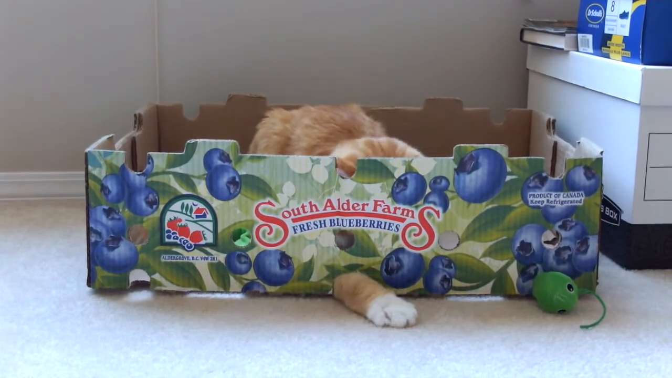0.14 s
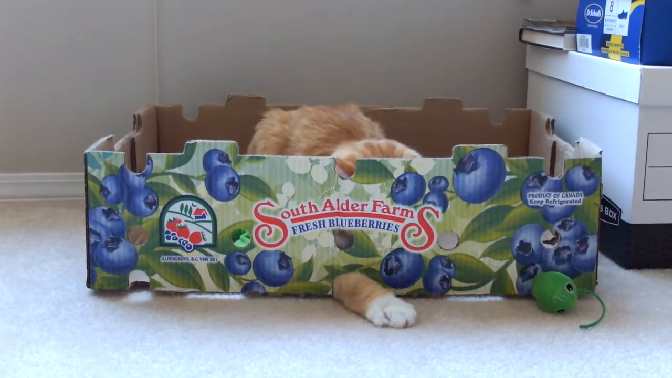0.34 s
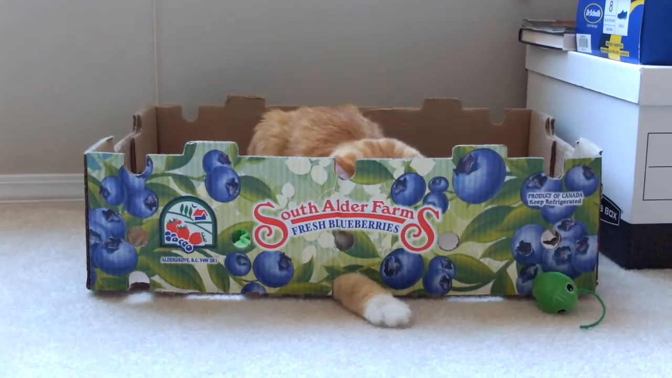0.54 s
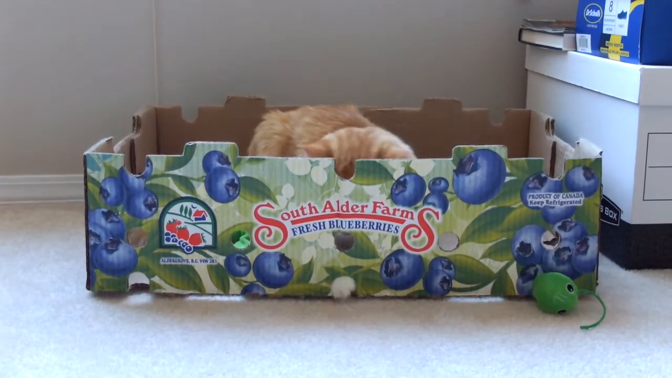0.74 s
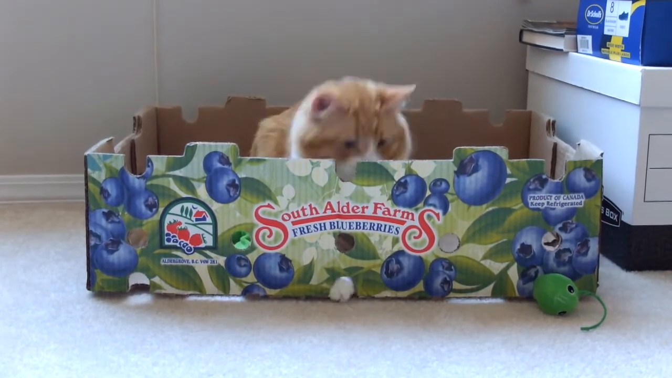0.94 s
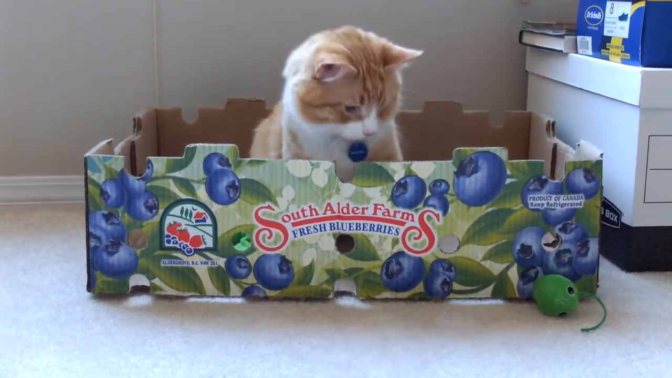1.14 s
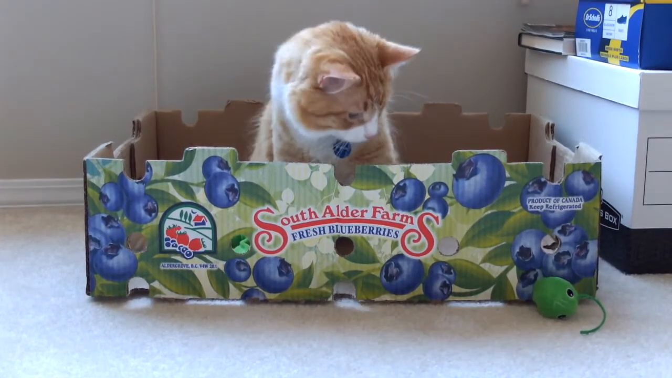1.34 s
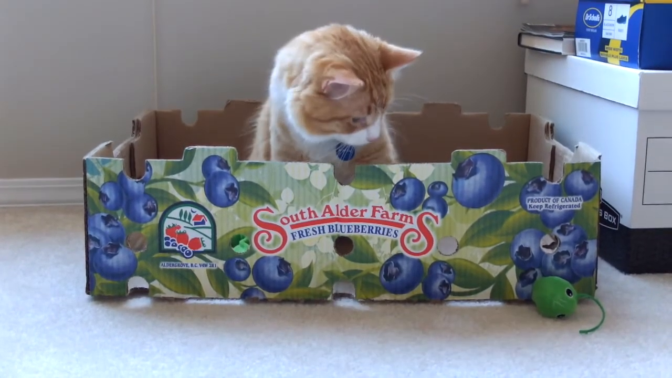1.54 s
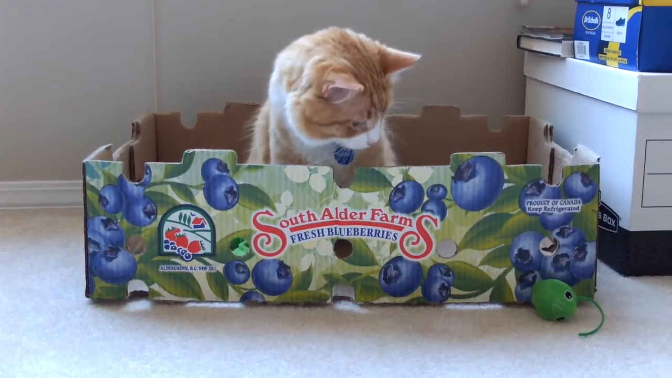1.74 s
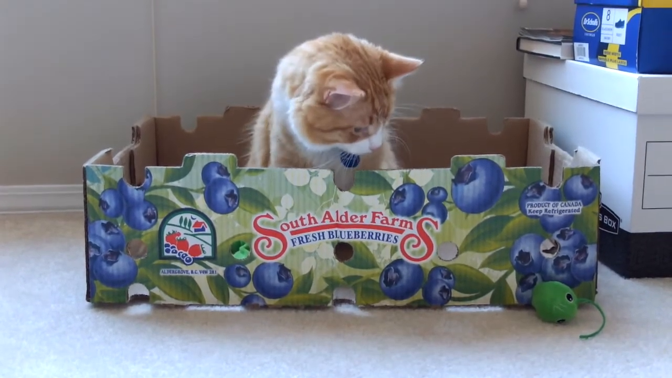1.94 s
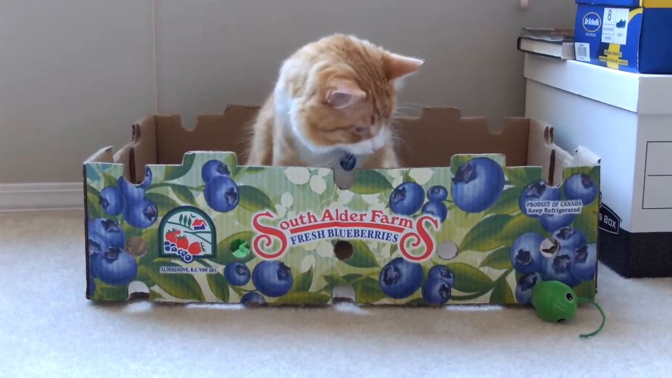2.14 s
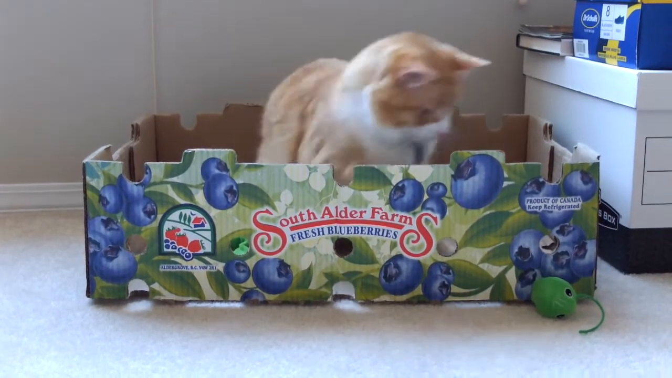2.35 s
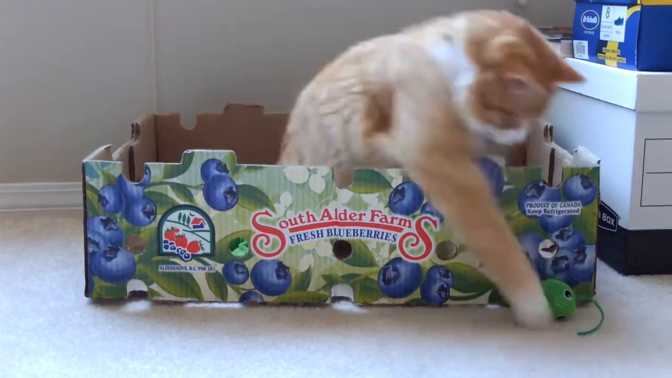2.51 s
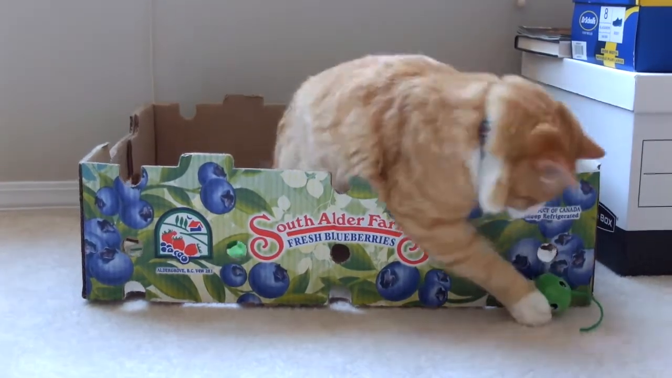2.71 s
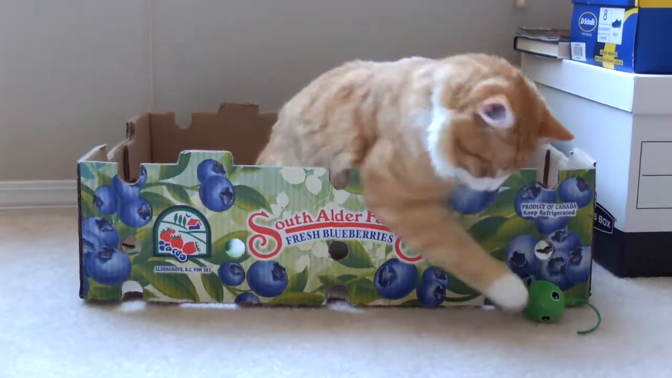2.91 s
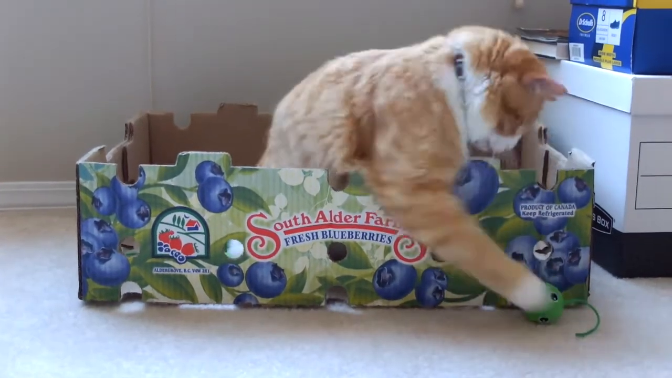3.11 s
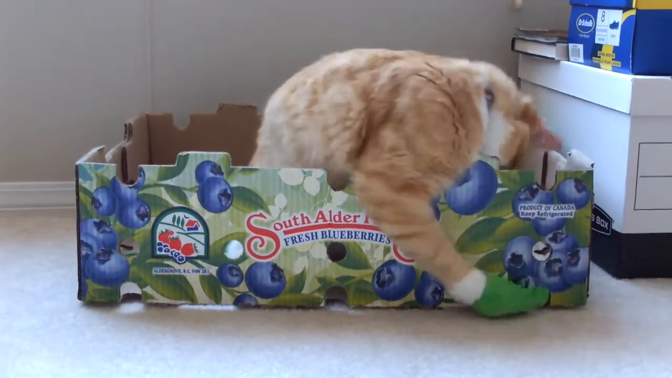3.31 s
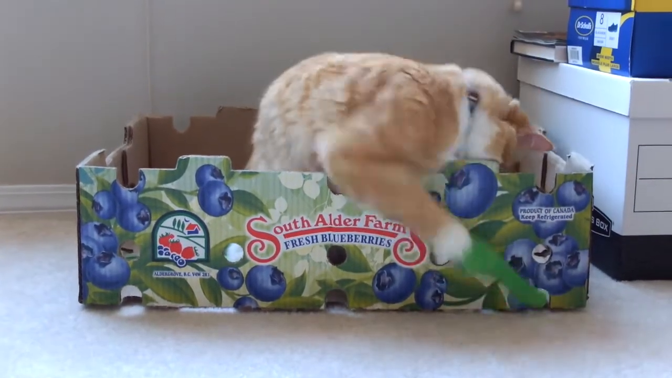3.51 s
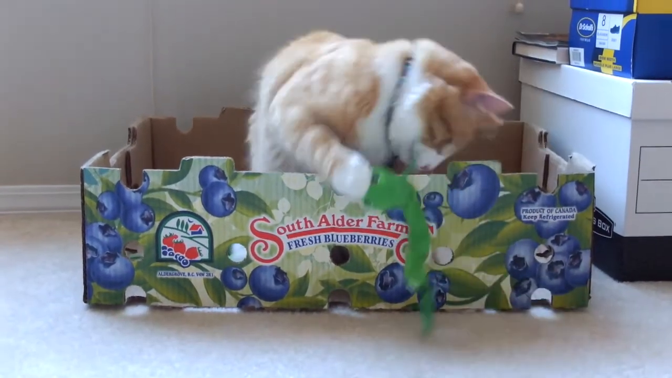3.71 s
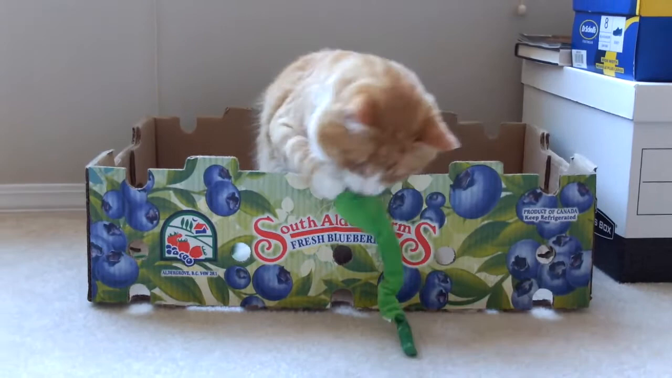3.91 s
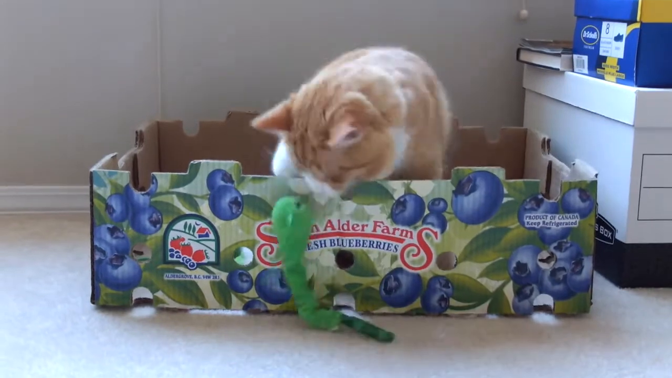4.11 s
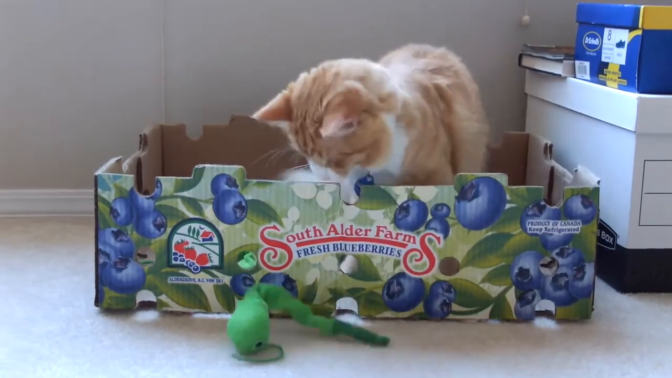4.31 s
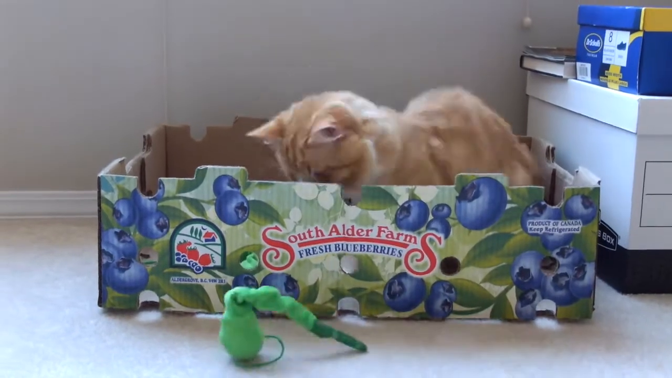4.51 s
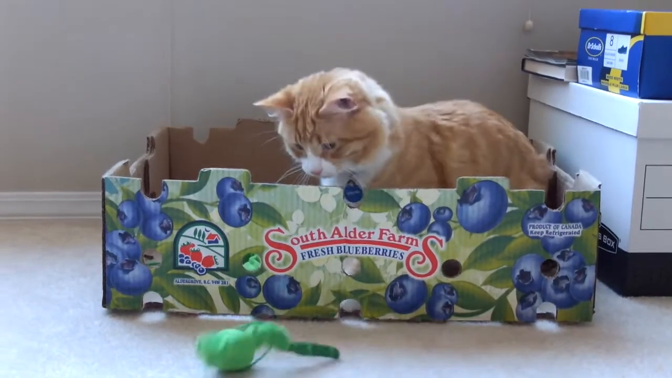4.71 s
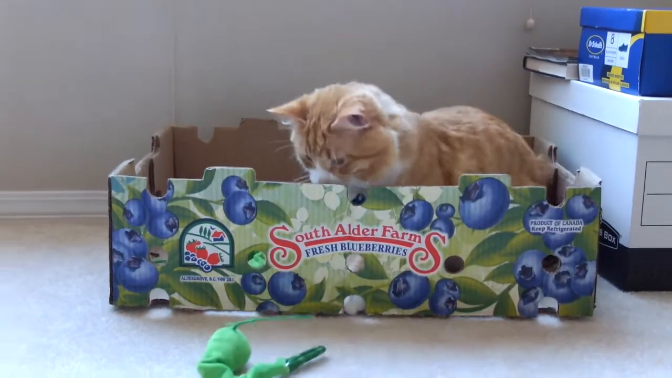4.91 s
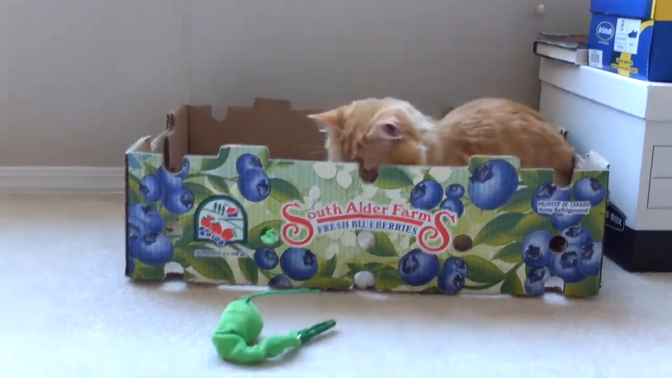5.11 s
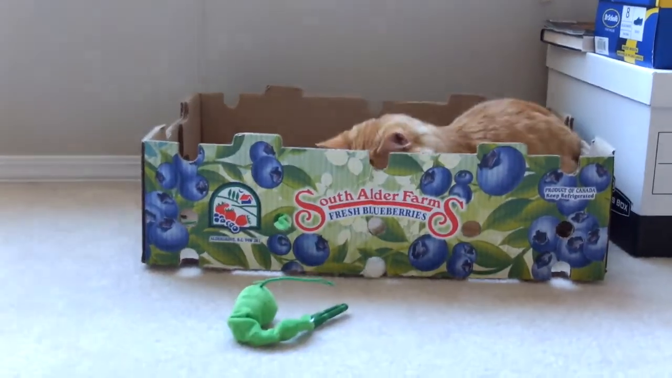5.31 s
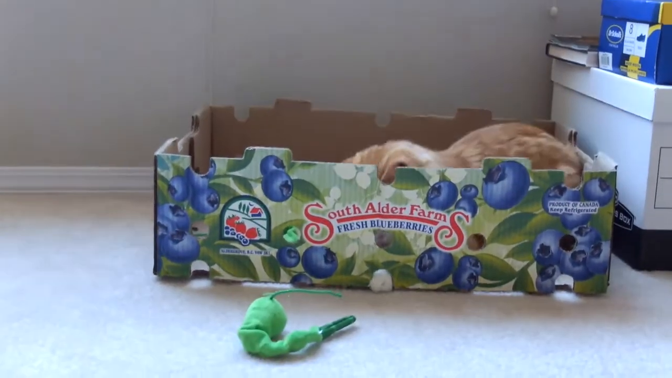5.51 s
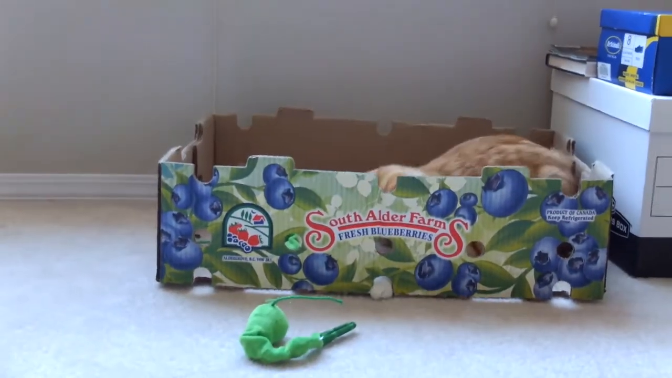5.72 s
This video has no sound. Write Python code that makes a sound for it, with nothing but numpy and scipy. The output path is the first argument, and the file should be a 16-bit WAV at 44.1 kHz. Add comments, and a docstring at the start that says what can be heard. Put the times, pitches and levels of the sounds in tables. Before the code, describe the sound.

A cat rubs and paws inside a cardboard box, with a flurry of hollow knocks and claw ticks over a steady room hum.

```python
"""A cat plays in an open cardboard box on a carpet, two metres from a small stereo microphone.
Fur rubs along the paper and a leg slides back through a hole in the wall, whose rim sings. From 2.3 s
paws knock the walls, claws tick, its weight thuds on the floor panel and the metal collar tag tinkles
once. After 3.4 s the knocks and rubs are lighter, then thin out. Throughout, a furnished room answers
over its steady ventilation hum and a thin electrical whine."""
import sys
import numpy as np
from scipy import signal
from scipy.fft import rfft, irfft
from scipy.io import wavfile
from scipy.ndimage import uniform_filter1d

SR = 44100
rng = np.random.default_rng(int(sys.argv[2]) if len(sys.argv) > 2 else 0)


def put_to_file(sound):
    """Save the sound as 16-bit audio at rate SR, in the file named by the first command-line argument."""
    columns = np.atleast_2d(sound).T  # one column per channel
    safe = np.clip(columns, -1, 1)
    whole_steps = np.round(safe * 32767)
    wavfile.write(sys.argv[1], SR, whole_steps.astype(np.int16))


N = 253575
T = np.arange(N) / SR

# long walls, stiff edges, corrugation: pitch_hz, level_db, base_t60_s
WALL_MODES = [(242.3, -23, 0.7), (298.4, -14.5, 0.16), (342.4, -8.5, 0.15), (392, -3.5, 0.075),
              (447.7, 2.5, 0.059), (540, -67, 0.062)]
EDGE_MODES = [(600, -4, 0.12), (685, -3, 0.079), (784, 8.5, 0.081), (908, 10.5, 0.042), (1001, 4.5, 0.08),
              (1106, 5, 0.14), (1171, 14.5, 0.022), (1260, -31.5, 0.0099), (1273, -10.5, 0.032)]
RIB_MODES = [(1330, -5, 0.11), (1488, 13, 0.039), (1800, -39, 0.011), (1735, 23.5, 0.0093),
             (1980, -11, 0.0037), (2156, 7, 0.046), (2620, 8, 0.015)]
# paw blows: start_s, wall_db, wall_favour_hz, edge_db, edge_favour_hz, rib_db, t60_scale
KNOCKS = [(0.922, -42, 480, -40.5, 816, -58, 0.69), (2.351, -38, 244, -38.5, 708, -42.5, 1),
          (2.545, -31.5, 450, -28.5, 1250, -41, 1), (2.553, -56, 498, -19.5, 940, -28.5, 1),
          (2.565, -33, 509, -49, 837, -42, 1), (2.587, -13, 327, -27, 790, -35, .84),
          (2.603, -15.5, 310, -47, 1200, -33, 0.64), (2.669, -27, 490, -38, 686, -32, 1),
          (2.797, -23.5, 500, -17, 1190, -18.5, 0.64), (2.805, -22.5, 431, -26.5, 1240, -34, 0.67),
          (2.899, -28, 600, -16, 800, -23, 0.24), (2.91, -22, 246, -23, 900, -40, 0.38),
          (2.916, -53, 473, -17.5, 655, -21, 0.31), (2.923, -27, 546, -23, 651, -32, 0.94),
          (2.933, -28, 231, -30, 1330, -23.5, 0.23), (2.942, -22.5, 256, -27, 805, -25, 0.68),
          (2.977, -21, 314, -22, 646, -53, 1), (3.061, -11, 477, -17, 630, -12.5, 1),
          (3.075, -48, 345, -16.5, 720, -19.5, 0.49), (3.094, -49, 343, -43, 660, -25, 1),
          (3.352, -20, 494, -17.5, 716, -24, 0.71), (3.614, -41, 238, -36.5, 850, -55, 0.71),
          (3.659, -38.5, 368, -63, 681, -56, 1), (3.788, -30, 240, -52, 751, -54, 0.74),
          (3.8, -39, 240, -57, 807, -55, .52), (3.992, -18, 373, -22, 890, -32, 1),
          (4.047, -38, 340, -37, 670, -45, 0.71), (4.159, -29.5, 243, -31.5, 1220, -33.5, .9),
          (4.173, -28.5, 375, -59, 791, -42, 0.78), (4.222, -42, 261, -47, 945, -45, 0.6),
          (4.233, -57, 269, -31, 1270, -37, 1), (4.369, -46, 249, -59, 759, -60, .9),
          (4.486, -37, 388, -53, 708, -48, .79), (4.51, -56, 471, -37.5, 1160, -37, 1),
          (5.315, -38, 479, -45, 1320, -45, 1)]

def paw_knocks():
    """Every blow rings the parts of the box in its own proportion."""
    out = np.zeros(N)
    for start_s, wall_db, wall_hz, edge_db, edge_hz, rib_db, t60_scale in KNOCKS:
        add(out, start_s, undb(wall_db) * ring(WALL_MODES, wall_hz, t60_scale, detune=0.037))
        add(out, start_s, undb(edge_db) * ring(EDGE_MODES, edge_hz, t60_scale, detune=0.06))
        add(out, start_s, undb(rib_db) * ring(RIB_MODES, 1580, t60_scale, detune=0.056))
    return out


# floor panel of the box: pitch_hz, level_db, base_t60_s
PANEL_MODES = [(93.5, -4, 0.16), (134, -1, 0.21), (155, 7.5, 0.099), (154.4, 4, 0.27), (190.7, 18, 0.089)]
# landings: start_s, peak_db, favour_hz
THUDS = [(0.66, -50, 122), (2.35, -30.5, 163), (2.357, -33, 157), (2.552, -35.5, 170), (2.587, -30.5, 199),
         (2.67, -38, 216), (2.743, -29, 130), (2.898, -28.5, 173), (2.938, -34, 208), (3.075, -28, 139),
         (3.093, -37, 212), (3.213, -48.5, 109), (3.582, -43.5, 105), (3.671, -43, 100),
         (3.769, -36.5, 136), (3.789, -31.5, 208), (3.992, -36.5, 200), (4.173, -47, 213), (4.37, -46, 151),
         (4.423, -40.5, 217), (4.486, -39, 161), (4.51, -34, 167), (5.317, -32, 189), (5.555, -47, 171)]

def panel_thuds():
    """The cat's weight thuds on the floor panel."""
    out = np.zeros(N)
    for start_s, peak_db, favour_hz in THUDS:
        add(out, start_s, undb(peak_db) * ring(PANEL_MODES, favour_hz, t60_scale=1.1, detune=0.063))
    return out


# floor under the box: pitch_hz, level_db, base_t60_s
FLOOR_MODES = [(58, -7, 0.073), (81, 11, .08)]
# heavy steps: start_s, peak_db
STEPS = [(2.587, -46), (2.745, -61), (3.665, -50), (3.767, -42), (3.787, -40), (4.515, -64)]

def floor_booms():
    """Heavy steps boom through the floor."""
    out = np.zeros(N)
    for start_s, peak_db in STEPS:
        add(out, start_s, undb(peak_db) * ring(FLOOR_MODES, detune=0.05))
    return out


# claw contacts: start_s, peak_db, pitch_hz
TICKS = [(0.661, -49, 5430), (0.921, -49.5, 2830), (1.056, -47.5, 3990), (1.329, -48, 4330),
         (2.553, -33.5, 2700), (2.564, -33, 5560), (2.586, -33, 2750), (2.669, -34.5, 2940),
         (2.797, -27, 5730), (2.898, -24, 2900), (2.919, -32, 3230), (2.925, -31, 2900), (2.931, -26, 2920),
         (3.06, -28.5, 2730), (3.094, -33, 2880), (3.352, -36.5, 3020), (3.581, -40, 7080),
         (3.611, -37, 3640), (3.622, -42, 6700), (3.659, -34, 3940), (3.672, -42, 3130), (3.801, -47, 5800),
         (3.836, -34, 3400), (3.847, -46, 3420), (3.875, -45, 3300), (3.993, -35.5, 2860),
         (4.159, -24.5, 4680), (4.221, -41.5, 3240), (4.51, -51, 3420), (4.893, -48, 6100),
         (5.554, -46, 5690)]

def claw_ticks():
    """Claw tips skip over the paper, each a short noisy scratch around one pitch."""
    out, t = np.zeros(N), T[:SR // 10]
    for start_s, peak_db, pitch_hz in TICKS:
        burst = rng.standard_normal(len(t)) * undb(-30 * t / 0.0092)
        tick = butterworth(resonate(burst, pitch_hz, q=2.1), [2200, min(2.53 * pitch_hz, 0.4 * SR)])
        add(out, start_s, undb(peak_db) * tick / np.abs(tick).max())
    return out


# fur or claw along the paper: start_s, top_rms_db, centre_hz, length_s
STROKES = [(0.003, -49, 4950, 0.079), (0.03, -66, 2780, 0.023), (0.644, -44.5, 5470, 0.073),
           (0.67, -59.5, 5500, 0.2), (2.903, -47, 2390, 0.02), (2.924, -53, 3000, 0.055),
           (3.091, -41, 2200, 0.025), (3.258, -56.5, 6600, 0.077), (3.538, -48, 6200, 0.052),
           (3.563, -50.5, 3120, 0.054), (3.603, -45, 6850, 0.047), (3.646, -51.5, 4100, 0.072),
           (3.999, -53.5, 2900, 0.027), (4.192, -46, 2800, 0.034), (4.209, -42, 2330, 0.052),
           (4.241, -50.5, 2320, 0.087), (4.482, -53, 4260, 0.061), (4.543, -56.5, 5500, 0.069)]

def strokes():
    """Each stroke swells and fades, a grainy hiss around its own pitch."""
    out, slips = np.zeros(N), grains(rate_per_s=6000, spread_db=1.9)
    for start_s, top_rms_db, centre_hz, length_s in STROKES:
        swell = np.hanning(int(length_s * SR))
        hiss = resonate(slips[int(start_s * SR):][:len(swell)], centre_hz, q=2.2)
        add(out, start_s, undb(top_rms_db) * swell * unit(hiss))
    return out


# fur on paper: freq_hz, density_db
FUR_SPECTRUM = [(1180, 23.5), (2000, 7), (2600, 25.5), (3300, 19), (4900, 20.5), (6590, -3), (12200, -18),
                (16000, -13)]
CRINKLE_BANDS_HZ = [1500, 3300, 5600, 8200, 11000, 14500]  # centre_hz

def fur_hiss(flicker_db=1.6):
    """Slipping hairs hiss in six separately flickering bands; returns the dull and bright halves."""
    hiss = unit(colour(grains(rate_per_s=12000, spread_db=1.5), FUR_SPECTRUM))
    flicker = unit(uniform_filter1d(slow_noise((6, N), SR // 30), SR // 60))
    bins_hz = np.fft.rfftfreq(N, 1 / SR)
    shares = [np.interp(bins_hz, CRINKLE_BANDS_HZ, band) for band in np.eye(6)]
    bands = undb(flicker_db * flicker) * irfft(rfft(hiss) * shares, N)
    contact = slow_noise((2, N), SR // 100)  # comes and goes many times a second
    dull = bands[:3].sum(0) * undb(0.52 * contact[0])
    bright = bands[3:].sum(0) * undb(2.1 * contact[1])
    return unit(dull), unit(bright)


# body along the box: start_s, hold_s, fur_db, bright_offset_db, box_db, step_per_part_db, panel_db
RUBS = [(0.005, 0.018, -52, 0.5, -51, -1, -64), (0.106, 0.023, -68, -15, -58.5, -3, -63),
        (0.2, 0.46, -81, -12, -78, -2, -70), (0.66, 0.022, -52, -0.5, -48.5, -5, -62),
        (0.706, 0.046, -68, 3, -55, 0.5, -71), (1.046, 0.034, -63.5, -4.5, -57.5, -14, -63.5),
        (1.134, .02, -73, -8, -61, -7, -70), (2.374, 0.042, -54.5, -6, -59.5, 0, -53),
        (2.542, 0.16, -55, -4, -46, -5.5, -59), (2.756, 0.053, -45, -10.5, -41.5, -1.5, -49),
        (2.924, 0.063, -57.5, -4, -39, -19, -47), (3.063, 0.017, -55, 5.5, -44, -18, -62),
        (3.211, 0.0084, -69, 8, -53, 0.5, -58), (3.276, 0.093, -60, 0.5, -63, 3, -68),
        (3.534, 0.14, -66.5, 11.5, -52, -2.5, -61), (3.777, 0.027, -64.5, -2, -55, -5.5, -50.5),
        (3.876, 0.16, -58.5, -0.5, -56, -6.5, -62), (4.124, 0.036, -54.5, -3, -56, -1, -51),
        (4.194, 0.042, -56.5, 1, -53, 0.7, -58), (4.297, 0.058, -57, -4.5, -68, 4, -61),
        (4.42, 0.031, -56, -5, -55, -3, -49), (4.499, 0.014, -52, -3, -51, -2.5, -57),
        (4.557, 0.021, -66, 3, -73, 5, -58), (4.724, 0.26, -68, -7, -69.5, 2, -65),
        (5.024, 0.15, -63, -7, -59.5, -1.5, -70), (5.285, 0.12, -62.5, -6.5, -54, -3, -57),
        (5.494, 0.23, -63.5, -6, -56, -2.5, -62)]

def rubbing(shudder_offset_db=-27.5):
    """Rubs hiss in the air and rumble through the box; loose flaps shudder after each knock."""
    start_s, hold_s, fur_db, bright_offset_db, box_db, step_per_part_db, panel_db = np.transpose(RUBS)
    dull, bright = fur_hiss()
    out = envelope(start_s, hold_s, fur_db) * dull
    out += envelope(start_s, hold_s, fur_db + bright_offset_db) * bright
    out += envelope(start_s, hold_s, panel_db) * rumble(PANEL_MODES)
    knock_s, wall_db, _, edge_db, _, rib_db, _ = np.transpose(KNOCKS)
    parts = [(WALL_MODES, wall_db), (EDGE_MODES, edge_db), (RIB_MODES, rib_db)]
    for part, (modes, knock_db) in enumerate(parts):
        rub = envelope(start_s, hold_s, box_db + part * step_per_part_db)
        shudder = envelope(knock_s + 0.031, 0, knock_db + shudder_offset_db, fall_db_per_s=110.5)
        out += np.hypot(rub, shudder) * rumble(modes)
    return out


def rumble(modes):
    """Dense slips keep one part of the box ringing, rms 1."""
    return unit(signal.fftconvolve(grains(rate_per_s=1500, spread_db=1.1), ring(modes))[:N])


# rim of the hole: time_s, pitch_hz, level_db
RIM_CURVE = [(0.69, 1488, -59), (0.702, 1454, -56), (0.73, 1470, -47), (0.78, 1504, -49.5),
             (0.82, 1540, -87)]

def hole_rim():
    """A sliding leg makes the rim sing: narrow noise around a gliding pitch."""
    time_s, pitch_hz, level_db = np.transpose(RIM_CURVE)
    flutter = slow_noise((2, N), SR // 260)
    phase = 2 * np.pi * np.cumsum(glide(time_s, pitch_hz, rest=1500)) / SR
    gain = undb(glide(time_s, level_db, rest=-100))
    return gain * (flutter[0] * np.cos(phase) + flutter[1] * np.sin(phase))


# metal disc: pitch_hz, level_db, base_t60_s
TAG_MODES = [(8910, 7, 0.16), (10330, 0, .1), (11800, -7, .1)]
# tag contacts: start_s, peak_db
TAG_TOUCHES = [(2.5926, -44), (2.605, -47), (2.6313, -42.5), (2.6776, -51)]

def collar_tag():
    """Four quick touches ring the small disc in one high tinkle."""
    out = np.zeros(N)
    for start_s, peak_db in TAG_TOUCHES:
        add(out, start_s, undb(peak_db) * ring(TAG_MODES, detune=0.00081))
    return out


# reverberation per band: band_hz, t60_s
ROOM_DECAY = [(100, 0.2), (500, 0.27), (2000, 0.32), (8000, 0.047)]

def room(direct, tail_db=-13.5, onset_s=0.0011):
    """Direct sound plus a diffuse tail that loses its treble first."""
    t, noise, tail = T[:SR // 2], rng.standard_normal(SR // 2), 0
    edges_hz = [20, 250, 1000, 4000, 20000]
    for (_, t60_s), low_hz, high_hz in zip(ROOM_DECAY, edges_hz, edges_hz[1:]):
        tail += undb(-60 * t / t60_s) * butterworth(noise, [low_hz, high_hz])
    tail *= np.minimum(t / onset_s, 1) ** 2
    return direct + undb(tail_db) * reflect(direct, tail)


# ventilation noise: freq_hz, density_db
HUM_SPECTRUM = [(13, -28), (22, -5.5), (100, -14.5), (132, -13), (179, -13), (263, -7.5), (302, -6),
                (585, -7.5), (861, -8), (1070, -9.5), (1760, -14), (2820, -21.5), (9480, -32.5),
                (11200, -34), (16000, -41.5)]
# room resonances: centre_hz, width_hz, gain_db
HUM_PEAKS = [(128.3, 29, 11.5), (260, 14, 9), (463, 107, 4.5)]

def ventilation(level_db=-53, swell_db=0.6):
    """Steady hum, swelling slightly; independent noise for mid and side."""
    hum = colour(rng.standard_normal((2, N)), HUM_SPECTRUM)
    for centre_hz, width_hz, gain_db in HUM_PEAKS:
        hum += (undb(gain_db) - 1) * resonate(hum, centre_hz, q=centre_hz / width_hz)
    return undb(level_db + swell_db * slow_noise(N, SR // 3)) * unit(hum)


def whine(pitch_hz=11040, rms_db=-80):
    """A thin electrical tone."""
    return undb(rms_db) * np.sqrt(2) * np.sin(2 * np.pi * pitch_hz * T)


def ring(modes, favour_hz=None, t60_scale=0.69, detune=0):
    """One blow's decaying modes, peak 1; the spot struck favours those near one pitch."""
    pitch_hz, level_db, base_t60_s = np.transpose(modes)[:, :, None]
    level_jitter, pitch_jitter = rng.standard_normal((2, len(modes), 1))
    if favour_hz:
        level_db = level_db - 22 * np.log2(pitch_hz / favour_hz) ** 2 + 2 * level_jitter
    t = T[:SR // 3]
    decay = undb(level_db - 60 * t / (base_t60_s * t60_scale))
    tone = (decay * np.sin(2 * np.pi * pitch_hz * (1 + detune * pitch_jitter) * t)).sum(0)
    # a padded paw pushes for a fraction of a cycle; a small box radiates little below its modes
    push = np.hanning(int(0.45 * SR / pitch_hz.mean()) + 3)
    cutoff_hz = max(0.83 * pitch_hz.min(), 0.62 * (favour_hz or 0))
    blow = butterworth(np.convolve(tone, push), cutoff_hz, "high", order=4)
    return blow / np.abs(blow).max()


def grains(rate_per_s, spread_db):
    """Dense little slips of uneven size, rms 1."""
    slips = (rng.random(N) < rate_per_s / SR) * rng.standard_normal(N)
    return unit(slips * undb(spread_db * rng.exponential(size=N)))


def envelope(start_s, hold_s, level_db, rise_db_per_s=442, fall_db_per_s=159):
    """Gain of events that rise until start_s, hold and fall, summed in power."""
    start_s, hold_s, level_db = (np.reshape(v, (-1, 1)) for v in (start_s, hold_s, level_db))
    t = T[::64]
    rise_db = rise_db_per_s * np.maximum(start_s - t, 0)
    fall_db = fall_db_per_s * np.maximum(t - start_s - hold_s, 0)
    return np.interp(T, t, np.linalg.norm(undb(level_db - rise_db - fall_db), axis=0))


def glide(time_s, values, rest):
    return uniform_filter1d(np.interp(T, time_s, values, left=rest, right=rest), SR // 100)


def slow_noise(shape, window_samples):
    return unit(uniform_filter1d(rng.standard_normal(shape), window_samples))


def colour(x, curve):
    freq_hz, gain_db = np.transpose(curve)
    bins_hz = np.maximum(np.fft.rfftfreq(x.shape[-1], 1 / SR), 1)
    return irfft(rfft(x) * undb(np.interp(np.log(bins_hz), np.log(freq_hz), gain_db)), x.shape[-1])


def butterworth(x, cutoff_hz, kind="band", order=2):
    return signal.sosfilt(signal.butter(order, cutoff_hz, kind, fs=SR, output="sos"), x)


def resonate(x, centre_hz, q):
    return signal.lfilter(*signal.iirpeak(centre_hz, q, SR), x)


def reflect(x, response):
    return signal.fftconvolve(x, response / np.linalg.norm(response))[:N]


def add(out, start_s, x):
    i = int(start_s * SR)
    out[i:i + len(x)] += x[:N - i]


def undb(db):
    return 10 ** (np.asarray(db) / 20)


def unit(x):
    return x / np.sqrt(np.mean(x ** 2, -1, keepdims=True))


# stereo width at two close ports: freq_hz, side_minus_mid_db
HUM_WIDTH = [(60, -10), (110, -12), (200, -12), (380, -14), (700, -13), (1290, -11), (2380, -8), (4400, -5),
             (8120, -3), (15000, -2)]
CAT_WIDTH = [(60, -19), (250, -27), (500, -22), (1000, -20), (2000, -13), (4000, -8), (8000, -3),
             (15000, -1)]

def scene():
    """Cat and background, left and right; the side hears the cat through scattered early reflections."""
    hum_mid, hum_side = ventilation()
    impacts = paw_knocks() + panel_thuds() + floor_booms() + claw_ticks()
    cat = room(impacts + strokes() + rubbing() + hole_rim() + collar_tag())
    scatter = rng.standard_normal(4000) * undb(-60 * T[:4000] / 0.16)
    side = colour(hum_side, HUM_WIDTH) + colour(reflect(cat, scatter), CAT_WIDTH)
    mid = hum_mid + cat + whine()
    return np.array([mid + side, mid - side])


# capsule balance: freq_hz, left_minus_right_db
BALANCE = [(60, -0.5), (110, -1.0), (200, -0.5), (380, -1.0), (700, -1.0), (1290, -1.5), (2380, 0.5),
           (4400, -0.5), (8120, 3), (15000, 3)]
LOWPASS_HZ = 15850

def record(dry):
    """The two capsules differ in colour; the top is cut."""
    pair = [colour(x, [(hz, sign * db / 2) for hz, db in BALANCE]) for x, sign in zip(dry, (1, -1))]
    return signal.sosfilt(signal.ellip(10, 0.2, 70, LOWPASS_HZ, fs=SR, output="sos"), pair)


dry = scene()
out = record(dry)
put_to_file(out)
```